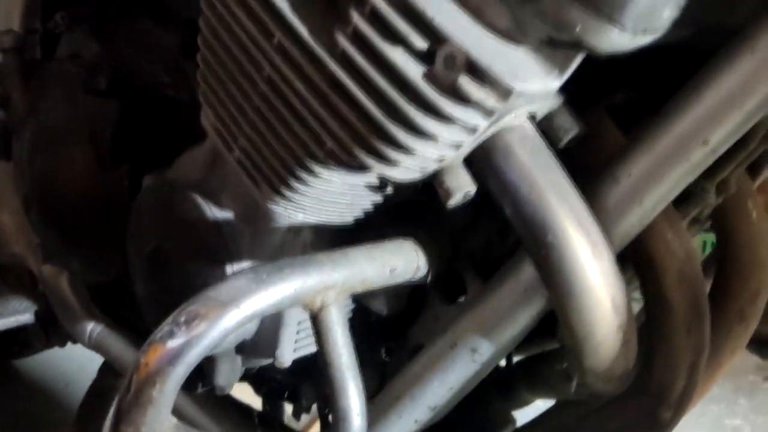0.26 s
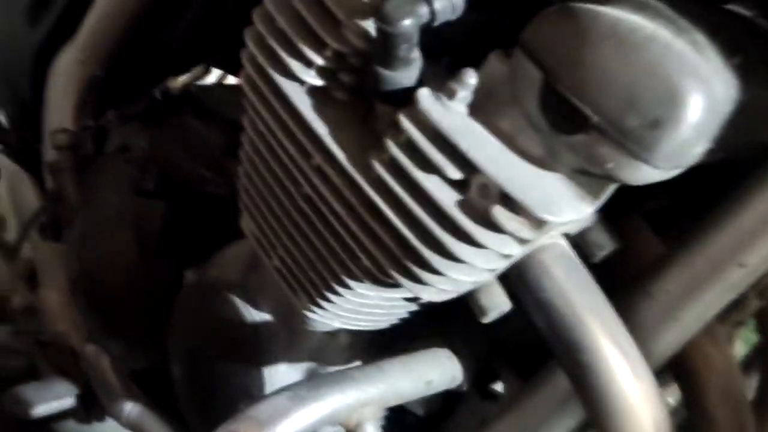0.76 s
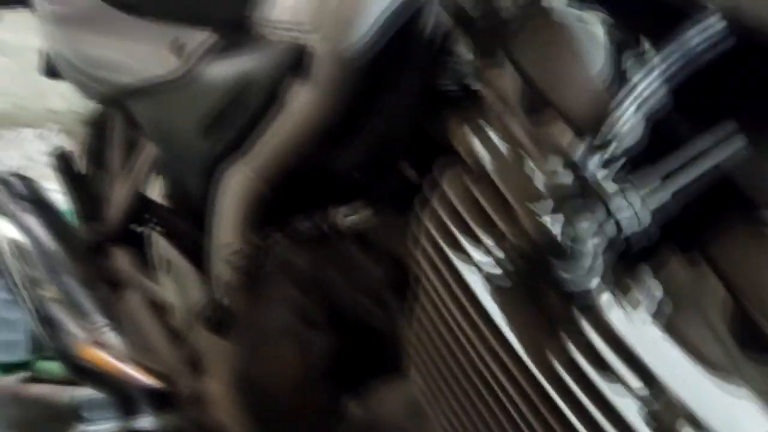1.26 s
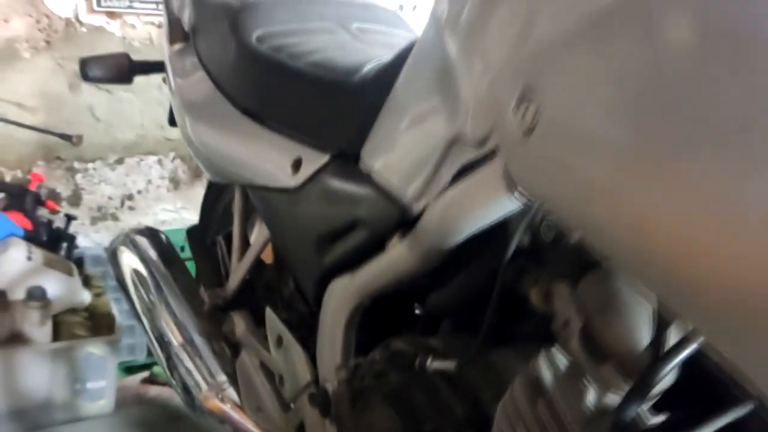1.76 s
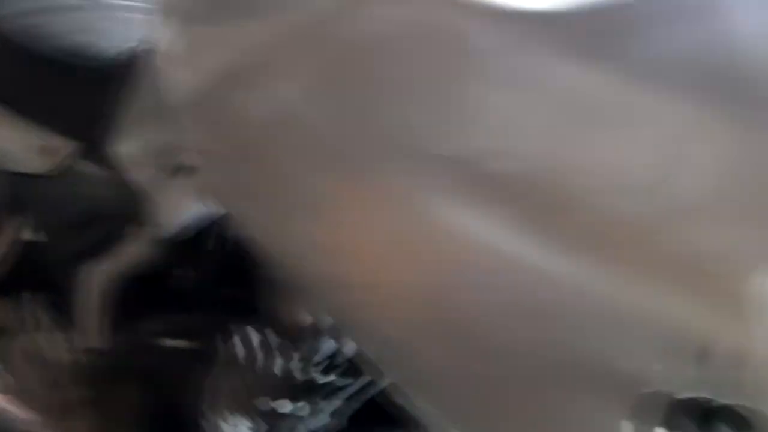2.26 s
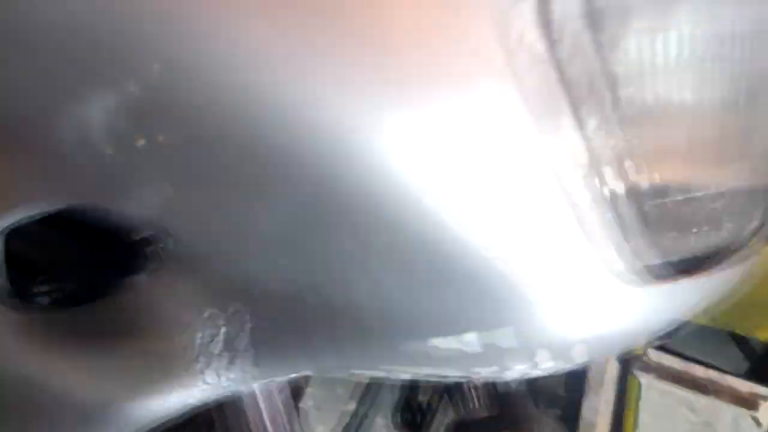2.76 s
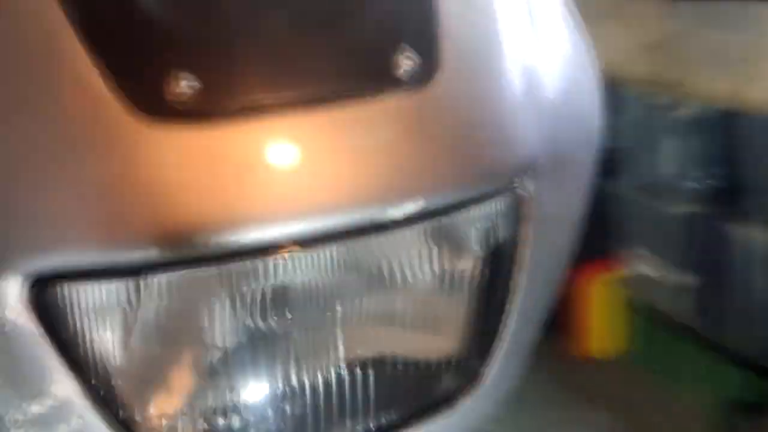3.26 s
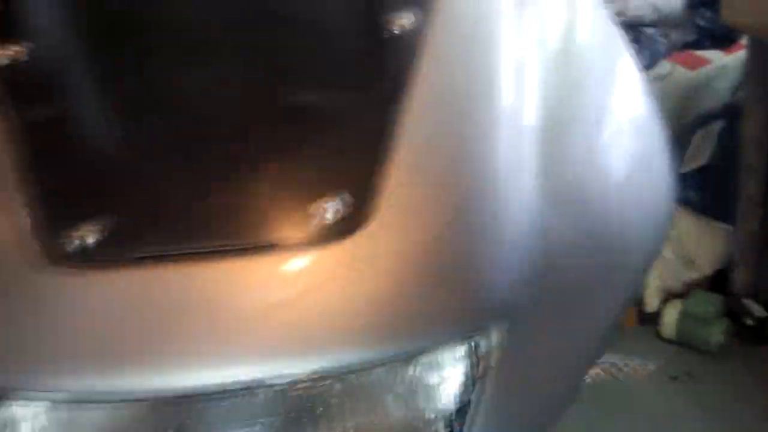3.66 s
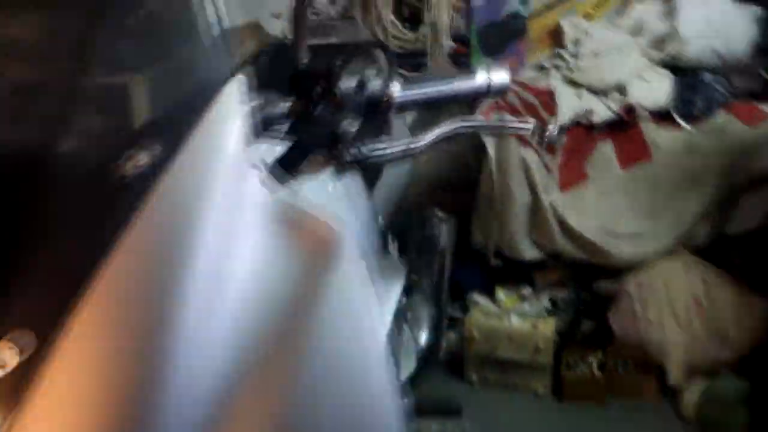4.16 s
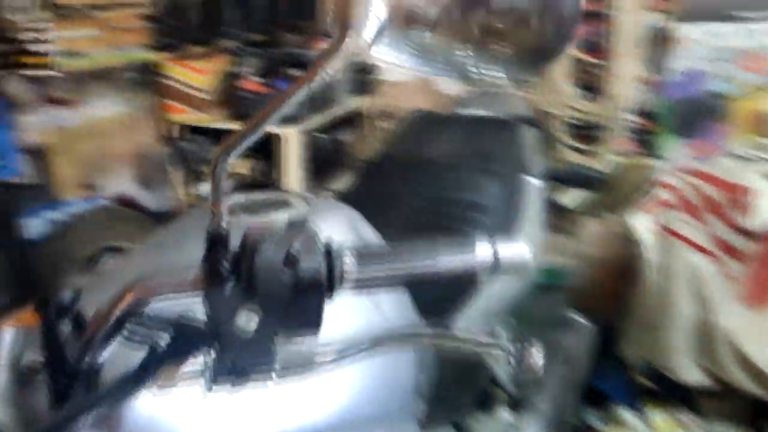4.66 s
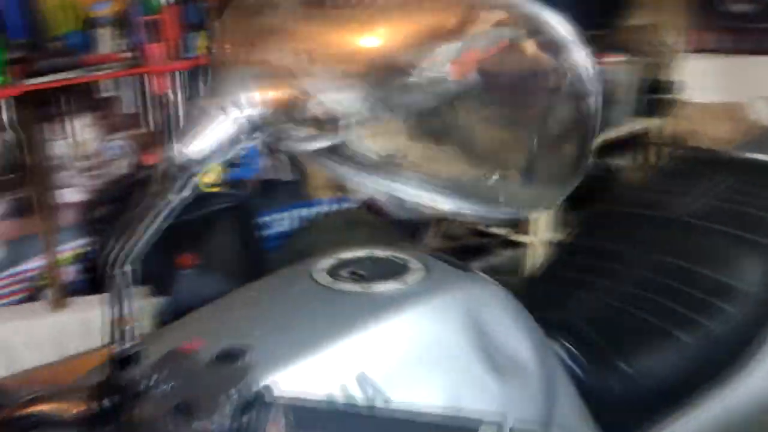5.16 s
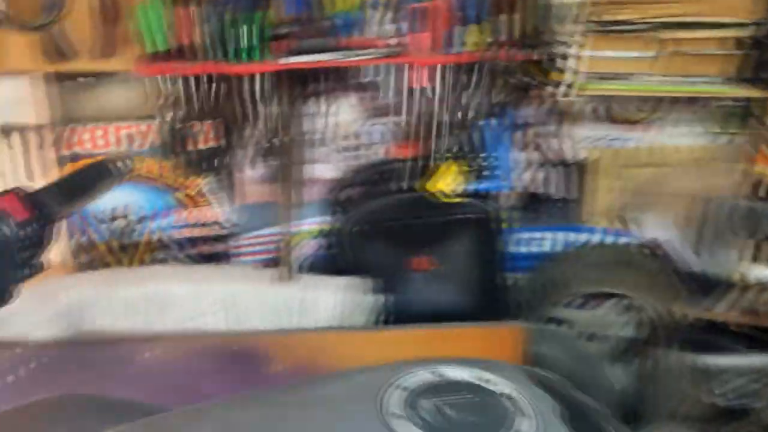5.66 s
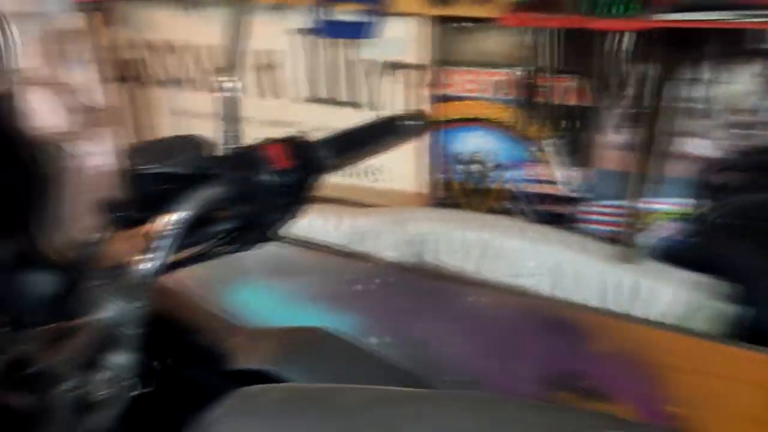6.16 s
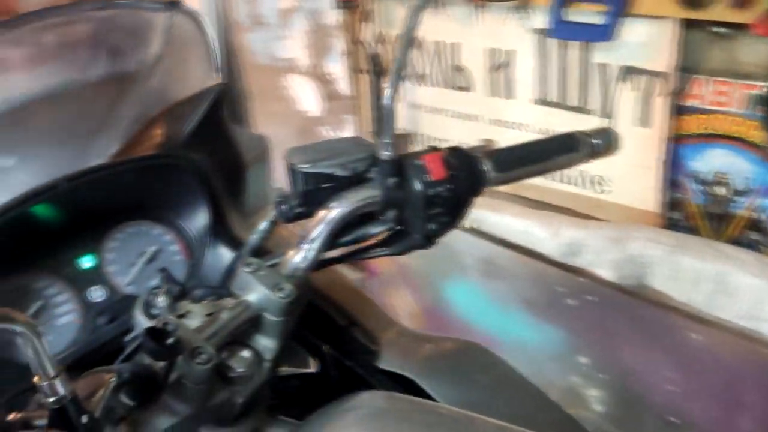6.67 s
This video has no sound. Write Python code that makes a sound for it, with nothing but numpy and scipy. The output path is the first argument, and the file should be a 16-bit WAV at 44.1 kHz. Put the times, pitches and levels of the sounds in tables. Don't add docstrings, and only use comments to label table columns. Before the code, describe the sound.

Continuous uneven motorcycle idling, heard close in a small enclosed room. A deep, almost tonal exhaust hum throbs and briefly sags with weak firings. Bright irregular metal clicks dominate the first two seconds beside the finned cylinder, with occasional brittle snaps. As the moving microphone passes the bodywork, the clatter recedes, hollow midrange rumble changes colour, and walls blur everything. The engine keeps idling to the end.

```python
import sys
import numpy as np
from scipy import signal
from scipy.fft import rfft, irfft, next_fast_len
from scipy.io import wavfile
from scipy.ndimage import uniform_filter1d, map_coordinates

SR = 44100
rng = np.random.default_rng(int(sys.argv[2]) if len(sys.argv) > 2 else 0)


def makeup_ratio(level_db):
    decades = np.asarray(level_db, float) / 20
    return 10 ** decades


def master_out(mix):
    frames = np.transpose(np.atleast_2d(mix))
    ceiling = np.clip(frames, -1, 1)
    pcm = np.round(ceiling * 32767).astype(np.int16)
    wavfile.write(sys.argv[1], SR, pcm)


N = 304624
LEFT_RIGHT = np.array([[1], [-1]])


def unit(x):
    return x / np.sqrt(np.mean(x ** 2) + 1e-20)


def along(points, hz):
    f, v = np.transpose(points)
    return np.interp(np.log(hz + 1), np.log(f + 1), v)


def curves(rows):
    s, *cols = np.transpose(rows)
    return [np.interp(np.arange(N) / SR, s, c) for c in cols]


def wobble(rate):
    knots = rng.standard_normal(int(N * rate / SR) + 4)
    return map_coordinates(knots, [np.arange(N) * rate / SR])


def filtered(x, response):
    m = next_fast_len(N + 8192)
    return irfft(rfft(x, m) * response(np.fft.rfftfreq(m, 1 / SR)), m)[..., :N]


def peak(f, hz, width_hz):
    return 1j * f * width_hz / (hz * hz - f * f + 1j * f * width_hz)


# frequency in Hz, left-right likeness from 0 to 1.
COHERENCE = [(60, 0.87), (180, 1), (530, 0.56), (1590, 0.067), (4730, 0.024), (14100, 0.01)]


def rush(spectrum, patchy_db):
    z = signal.stft(rng.standard_normal((2, N)), nperseg=512)[2]
    patches = uniform_filter1d(rng.standard_normal(z.shape[1:]), size=6, axis=0)
    patches = uniform_filter1d(patches, size=8, axis=1)
    pair = signal.istft(z * makeup_ratio(patchy_db * unit(patches)), nperseg=512)[1][:, :N]

    def mid_side_response(hz):
        angle = np.arccos(np.clip(along(COHERENCE, hz), -1, 1)) / 2
        return makeup_ratio(along(spectrum, hz)) * [np.cos(angle), np.sin(angle)]

    mid, side = filtered(pair, mid_side_response)
    return unit(np.array([mid + side, mid - side]))


# time in seconds, speed in rpm.
FULL_SPEED = [(0.0, 811.5), (0.53, 966.8), (1.06, 975.9), (1.59, 939.5), (2.13, 954.2), (2.66, 960.7),
              (3.19, 942.0), (3.72, 1095.7), (4.25, 927.7), (4.78, 977.7), (5.32, 918.8), (5.85, 904.4),
              (6.38, 885.3), (6.91, 1089.4)]


def cycles():
    start = -0.027
    rpm = curves(FULL_SPEED)[0] - stumbling()
    return start + np.cumsum(rpm) / (2 * 60 * SR)


# time in seconds, speed lost in rpm.
POOR_FIRINGS = [(0.04, 29), (0.195, 224), (0.389, 110), (0.688, 83), (0.788, 108), (0.973, 125),
                (1.132, 40), (1.262, 130), (1.422, 61), (1.586, 78), (1.886, 146), (2.02, 48), (2.165, 124),
                (2.355, 48), (2.464, 111), (2.654, 64), (2.784, 82), (2.953, 49), (3.223, 201), (3.407, 46),
                (3.517, 242), (3.707, 84), (3.821, 137), (4.131, 38), (4.28, 128), (4.585, 149),
                (4.849, 169), (5.153, 59), (5.298, 44), (5.433, 73), (5.627, 58), (5.887, 66), (6.091, 3),
                (6.211, 60), (6.336, 78), (6.475, 189), (6.675, 202), (6.844, 107)]


def stumbling():
    fall_s, recover_s = 0.06, 0.3
    s, rpm = np.transpose(POOR_FIRINGS)
    t = np.arange(0, N / SR + 0.01, 0.002)
    since = t[:, None] - s
    fall = np.clip(since / fall_s + 0.5, 0, 1)
    lost = fall * np.exp(-np.maximum(since, 0) / recover_s) @ rpm
    return np.interp(np.arange(N) / SR, t, lost)


# time in seconds, pitch in Hz, full-firing level in dB.
ROOM_BOOM = [(0.0, 79.9, -11.5), (0.41, 73.27, -14.5), (0.81, 78.8, -14.5), (1.22, 77.5, -11.2),
             (1.63, 78.1, -10.5), (2.03, 76.97, -9), (2.44, 78.9, -6.5), (2.85, 79.4, -5.4),
             (3.25, 79.6, -6.5), (3.66, 78.6, -11.5), (4.06, 80.9, -10.5), (4.47, 78.8, -8),
             (4.88, 78.5, -8.5), (5.28, 80.1, -9.5), (5.69, 79.2, -8.5), (6.1, 81.4, -12.5),
             (6.5, 76.25, -13.5), (6.91, 77.4, -16.5)]
# time in seconds, share of the boom lost from 0 to 1, half length in seconds.
WEAK_FIRINGS = [(0.19, 0.62, 0.041), (0.385, 0.44, 0.016), (0.584, 0.83, 0.019), (0.7, 0.88, 0.03),
                (0.772, 0.75, 0.035), (0.954, 0.66, 0.035), (1.273, 0.81, 0.043), (1.733, 0.28, 0.1),
                (1.883, 1, 0.033), (2.179, 0.61, 0.057), (2.393, 0.63, 0.081), (2.647, 0.46, 0.09),
                (2.783, 0.5, 0.047), (2.994, 0.6, 0.11), (3.119, 0.9, 0.012), (3.203, 0.91, 0.092),
                (3.482, 0.94, 0.071), (3.773, 0.87, 0.073), (4.145, 0.68, 0.1), (4.353, 0.47, 0.055),
                (4.568, 0.76, 0.064), (4.856, 0.91, 0.04), (5.182, 0.54, 0.038), (5.474, 0.38, 0.026),
                (5.648, 0.62, 0.034), (5.9, 0.57, 0.033), (6.204, 0.85, 0.051), (6.553, 0.94, 0.025),
                (6.74, 0.45, 0.019), (6.876, 0.83, 0.024)]
# multiple of the cycle rate, phase in radians,
# then level in dB at cylinder, fairing, headlamp, tank and handlebar.
STANDING_ORDERS = [(4, 2.8, -30, -26.5, -29.5, -28, -33), (8, 3.5, -30, -42, -41, -35, -27.5),
                   (10, -0.5, -31.5, -23.5, -42, -31, -38), (6, 1, -53, -54, -48, -45, -42),
                   (14, 3, -36, -41, -46, -30, -43), (20, 0.2, -46, -53, -53, -47, -41.5),
                   (28, 1.15, -45, -45.5, -46.5, -53.5, -54.5), (16, 2.44, -30.5, -30, -35, -41, -36)]
PLACE_TIMES = [
    1,
    2.302,
    3.9,
    5.2,
    6.3,
]
# frequency in Hz, density in dB per Hz.
THROB_SPECTRUM = [(7.1, -44), (12, -14), (27, -20), (42, -17), (59, 14.5), (81, 11.5), (106, -3), (130, -8),
                  (151, -40), (220, -26), (290, -65), (480, -120)]


def exhaust(cycle):
    t = np.arange(N) / SR
    hz, boom_db = curves(ROOM_BOOM)
    left = np.ones(N)
    for s, lost, half_s in WEAK_FIRINGS:
        left *= 1 - np.clip(lost, 0, 1) * np.exp(-0.5 * ((t - s) / half_s) ** 2)
    order_hz = 12 * np.gradient(cycle) * SR
    quick_hz = order_hz - uniform_filter1d(order_hz, size=SR // 2)
    hz = hz + 0.33 * quick_hz + 2.494 * (1 - left)
    tones = makeup_ratio(boom_db) * left * np.sin(2 * np.pi * np.cumsum(hz) / SR)
    for order, phase, *db in STANDING_ORDERS:
        level = makeup_ratio(np.interp(t, PLACE_TIMES, db) + 1.1 * wobble(6.1))
        tones = tones + level * np.cos(2 * np.pi * round(order) * cycle + phase)
    side = makeup_ratio(-29.5) * np.roll(tones, 120)
    throb = makeup_ratio(-26.0) * rush(THROB_SPECTRUM, patchy_db=2.0)
    return np.sqrt(2) * np.array([tones + side, tones - side]) + throb


# frequency in Hz, density in dB per Hz.
CASING_SPECTRUM = [(80, -29), (130, 1), (210, -6.5), (400, -7.5), (900, -12.5), (1400, -11.5),
                   (2200, -18.5), (2900, -25), (4800, -120)]
# frequency in Hz, width in Hz,
# then level in dB at cylinder, fairing, headlamp, tank and handlebar.
PANEL_MODES = [(199.5, 46, -8, -2, -3, -45, -32), (278.7, 29, -6.5, -4, 8.5, 1, 9),
               (504, 79, -9.5, -1, 6.5, -1, -7), (579, 26, 2, -1, 2, -3, -12), (659, 34, 6.5, 3, -2, -5, 2),
               (757, 37, 4.5, 5, 10.5, 5, -16), (846, 39, -8, -3, 4, -5, 2),
               (1057, 147, -10, 1.5, 1, -3.5, 4.5)]
# time in seconds, valve gear level in dB, left-right balance in dB.
NEARNESS = [(0, -29.5, 0), (.54, -30, 0), (1.19, -30, 1.5), (1.54, -31, 1.5), (2.81, -33, -.5),
            (4.42, -34, 2), (5.62, -33.5, 2), (6.19, -34.5, 2), (6.91, -33.5, 2)]


def casing(cycle):
    body = rush(CASING_SPECTRUM, patchy_db=1.5)
    ringing = body.copy()
    for hz, width_hz, *db in PANEL_MODES:
        mode = filtered(body, lambda f: np.abs(peak(f, hz, width_hz)) ** 2)
        ringing += makeup_ratio(np.interp(np.arange(N) / SR, PLACE_TIMES, db)) * mode
    near_db = curves(NEARNESS)[0]
    push_db = 0.63 * np.cos(4 * np.pi * cycle) + 1.2 * wobble(25)
    loudness = np.sqrt(np.abs(uniform_filter1d(np.mean(ringing ** 2, axis=0), size=SR // 2)))
    level_db = -35.5 + 1.17 * (near_db - near_db.mean()) + 2.5
    return makeup_ratio(level_db + push_db) * ringing / loudness


# frequency in Hz, density in dB per Hz.
GEAR_SPECTRUM = [(800, -33), (1500, -12), (2200, -3.5), (3100, -6), (4000, -4.5), (6000, -6.5),
                 (9000, -8.5), (12000, -10.5), (14300, -13.5), (15000, -64)]
# share of the cycle from 0 to 1, level in dB.
CYCLE_LOUDNESS = [(0, 1), (.13, 2.6), (.19, 2.5), (.33, -0.4), (.46, -1.5), (.6, 3.5), (.68, 3.5),
                  (.84, 1.5), (.93, 4), (1, 1.2)]


def gear(cycle):
    db, pan_db = curves(NEARNESS)
    swish_db = np.interp(cycle % 1, *np.transpose(CYCLE_LOUDNESS)) * (0.57 + 0.21 * wobble(7.9))
    rattle_db = 0.5 * wobble(12) + 0.63 * wobble(60)
    rattle_db = rattle_db + 0.47 * np.array([wobble(360), wobble(400)])
    level_db = db - 1.5 + swish_db + rattle_db + 0.53 * pan_db * LEFT_RIGHT
    return makeup_ratio(level_db) * rush(GEAR_SPECTRUM, patchy_db=1.5)


# frequency in Hz, level in dB.
CLICK_COLOUR = [(1500, -7), (3000, -22), (5000, -4), (8000, -7), (11200, -5.5), (15000, -14)]


def tappets(cycle):
    t = np.arange(SR // 16) / SR
    decay = makeup_ratio(-60 * t / 0.033) + 0.47 * makeup_ratio(-60 * t / 0.17)
    dying = decay * (1 - np.exp(-t / 0.0012))
    clicks, knocks = np.zeros((2, 2, N + len(t)))
    for s, db, pan_db in seatings(cycle):
        here = slice(round(s * SR), round(s * SR) + len(t))
        blow = makeup_ratio(db + 0.83 * pan_db * LEFT_RIGHT) * dying * rng.standard_normal((2, len(t)))
        clicks[:, here] += makeup_ratio(-4.0) * blow
        knocks[:, here] += makeup_ratio(-24) * blow
    click = filtered(clicks[:, :N], lambda hz: makeup_ratio(along(CLICK_COLOUR, hz)))
    knock = filtered(knocks[:, :N], lambda f: peak(f, 3700, 2900))
    return click + knock


# share of the cycle from 0 to 1, level in dB over the valve gear.
VALVE_SEATS = [(.17, 3.5), (.57, 11), (0.679, 10.5), (.91, 6.5)]
# start in seconds, peak level in dB, left-right balance in dB.
LOUD_TICKS = [(0.0154, -19, 1.5), (0.0744, -19, -2), (0.0925, -15, 2), (0.1311, -14.5, 6),
              (0.181, -10, -0.5), (0.2453, -19, 5), (0.287, -25, 3), (0.3286, -19, -0.5),
              (0.417, -13, -3.5), (0.4554, -19, 6), (0.4923, -12.5, 5), (0.548, -9, -2.5), (0.7383, -15, 1),
              (0.7765, -10.5, 0.0), (0.8305, -16, -3), (0.853, -13.5, -2), (0.9248, -22, 0.5),
              (1.005, -8, -1.5), (1.075, -15, -3), (1.1376, -13.5, -3), (1.1926, -9.5, -1),
              (1.3087, -13, -1), (1.3832, -10.5, 1), (1.4471, -20, -5), (1.4655, -12.5, 1.5),
              (1.504, -14, 3), (1.5364, -16, 3), (1.5947, -14, -2), (1.6896, -10.5, 2.5),
              (1.7997, -14, 5.0), (1.9473, -23, 5), (2.201, -20, -6), (2.2948, -18, -1),
              (2.3507, -15.5, -2), (2.521, -19, 0.0), (2.6477, -22, -5), (2.6706, -19, -8), (2.82, -21, -4),
              (2.9502, -23, -7), (2.9688, -19, -5), (3.2497, -24, -8), (3.4111, -18, 2.0),
              (3.5477, -33, 0.0), (3.8426, -21, -4), (3.9316, -16.5, 1), (4.4442, -18.5, 1),
              (4.527, -17.5, 4.0), (4.8723, -22, -1), (4.8893, -16, -1), (5.1878, -18, 2),
              (5.3385, -23, 5.0), (5.9155, -22, -2), (6.5447, -22, -2), (6.7037, -19, -3),
              (6.7447, -25, 5.0), (6.783, -22, 6), (6.8384, -15, 0)]


def seatings(cycle):
    share, db = np.tile(np.transpose(VALVE_SEATS), int(cycle[-1]))
    luck = rng.standard_normal((len(db), 3))
    turn = np.arange(len(db)) // len(VALVE_SEATS) + share + 0.011 * luck[:, 0]
    s = np.interp(turn, cycle, np.arange(N) / SR)
    gear_db = curves(NEARNESS)[0]
    mean_db = gear_db.mean()
    db = db + mean_db + 2.3 * (np.interp(turn, cycle, gear_db) - mean_db) + 2.5 * luck[:, 1]
    free = np.abs(s[:, None] - np.array(LOUD_TICKS)[:, 0]).min(axis=1) > 0.022
    return np.vstack([LOUD_TICKS, np.transpose([s, db, 3 * luck[:, 2]])[free]])


# start in seconds, peak level in dB.
TICK_CRACKS = [(.0927, -28), (.181, -28), (.2862, -24), (.4923, -27), (.7387, -23), (1.1922, -27),
               (1.5364, -21), (1.7988, -19), (4.444, -32), (5.1872, -24), (5.3387, -24)]


def snaps():
    x, t = np.zeros((2, N)), np.arange(SR // 50) / SR
    for s, db in TICK_CRACKS:
        envelope = makeup_ratio(db + 3 * LEFT_RIGHT - 60 * t / 0.013)
        x[:, round(s * SR):][:, :len(t)] += envelope * rng.standard_normal((2, len(t)))
    return filtered(x, lambda f: 2 * peak(f, 14000, 2800))


# time in seconds, pitch in Hz, level in dB.
ENGINE_HOLLOW = [(0, 486, -43), (1.2, 500, -54), (1.9, 510.5, -41.5), (2.4, 513.5, -47.5), (2.9, 546, -46),
                 (3.5, 543, -47), (4.05, 529.2, -39.5), (4.55, 500, -43.5), (4.75, 536, -61),
                 (5.05, 570.8, -43), (5.5, 580, -43.5), (5.85, 589, -63), (6.91, 500, -49)]
# time in seconds, pitch in Hz, level in dB.
FIN_HOLLOW = [(0, 660, -51), (.4, 660, -49), (.65, 670, -39), (.95, 700, -44), (1.25, 700, -39),
              (1.6, 660, -46), (2.2, 650, -53), (6.91, 650, -51)]


def hollow(rows, width_hz, side_db):
    hz, db = curves(rows)
    turn = 2 * np.pi * np.cumsum(hz) / SR

    def ring():
        return unit(wobble(width_hz) * np.cos(turn) + wobble(width_hz) * np.sin(turn))

    mid, side = ring(), ring()
    return makeup_ratio(db + 0.66 * wobble(13)) * (mid + makeup_ratio(side_db) * side * LEFT_RIGHT)


def scene():
    cycle = cycles()
    hollows = hollow(ENGINE_HOLLOW, width_hz=35, side_db=-10.5)
    hollows = hollows + hollow(FIN_HOLLOW, width_hz=140, side_db=-12)
    return exhaust(cycle) + casing(cycle) + hollows + gear(cycle) + tappets(cycle) + snaps()


def low_pass(x):
    return signal.sosfilt(signal.butter(12, 14690, fs=SR, output="sos"), x)


# frequency in Hz, width in Hz, level in dB.
PORT_CAVITIES = [
    (10980, 1540, 12),
    (8560, 1440, 11),
]
# frequency in Hz, left-right balance in dB.
PORT_BALANCE = [(60, 2.5), (150, -4), (400, 2), (1200, -0.5), (3000, -1), (5500, -2), (9000, -0.5),
                (14000, 2.5)]


def record(dry):
    def port_response(f):
        cavity = [1 + makeup_ratio(db) * np.abs(peak(f, hz, width_hz)) ** 2 for hz, width_hz, db in PORT_CAVITIES]
        balance = makeup_ratio(along(PORT_BALANCE, f) / 2 * LEFT_RIGHT)
        return np.array(cavity) * balance * (f < 14500)

    finished = filtered(dry, port_response)
    return low_pass(finished)


dry = scene()
out = record(dry)
master_out(out)
```